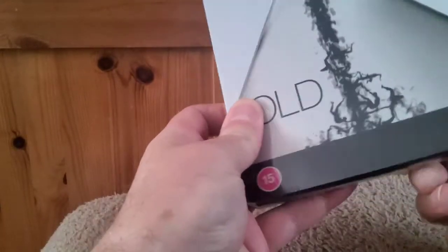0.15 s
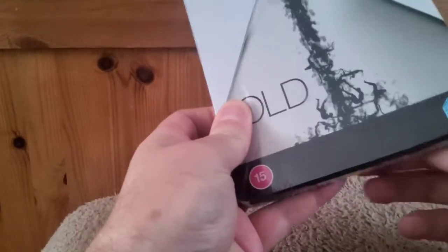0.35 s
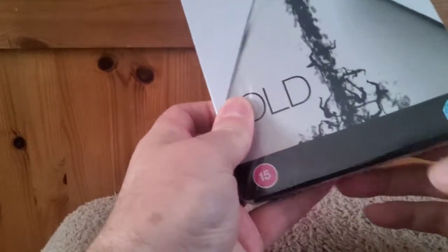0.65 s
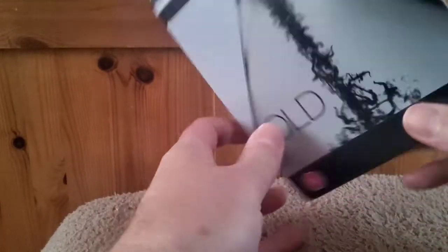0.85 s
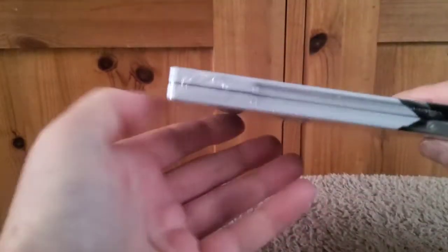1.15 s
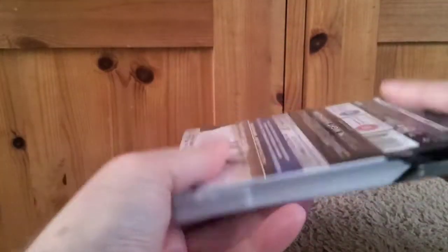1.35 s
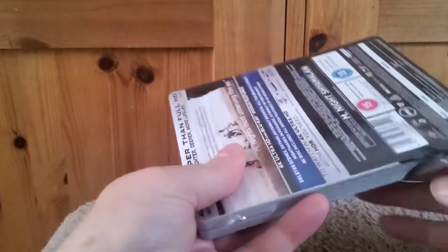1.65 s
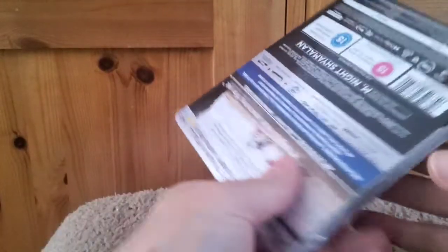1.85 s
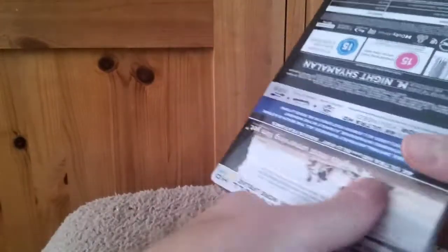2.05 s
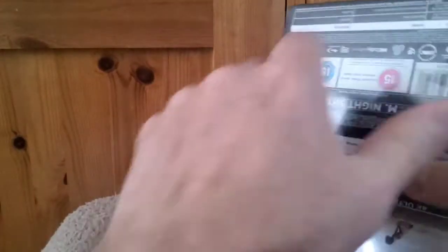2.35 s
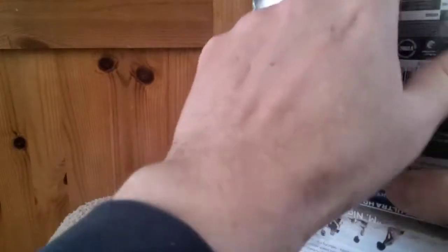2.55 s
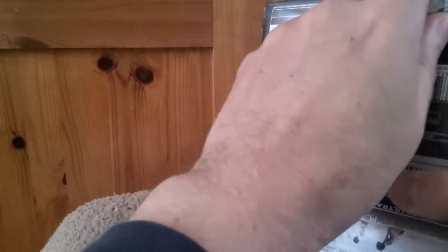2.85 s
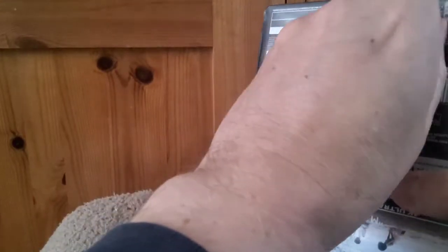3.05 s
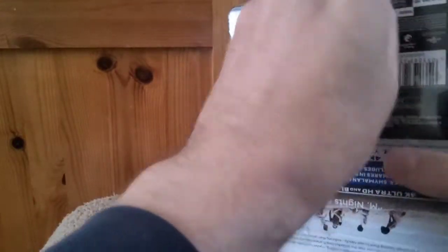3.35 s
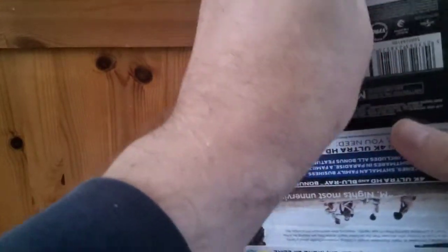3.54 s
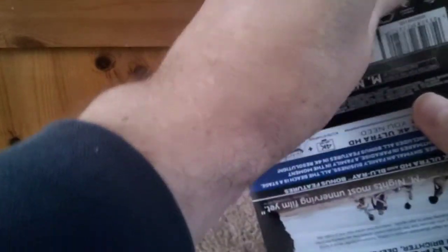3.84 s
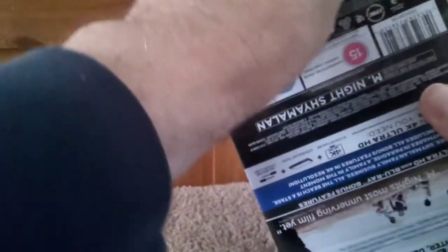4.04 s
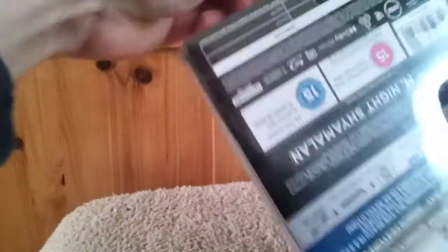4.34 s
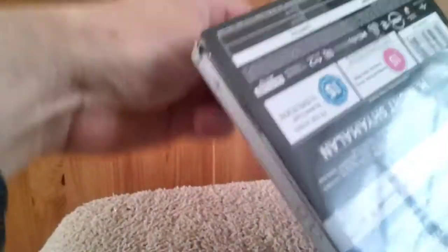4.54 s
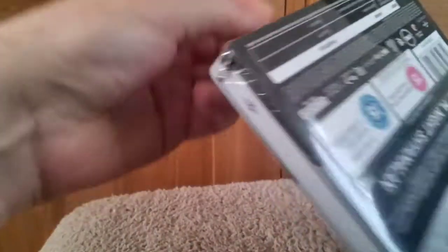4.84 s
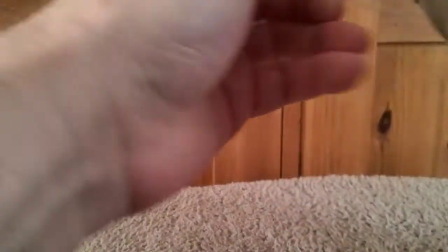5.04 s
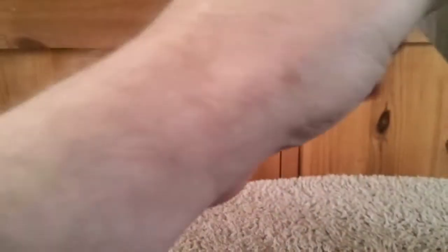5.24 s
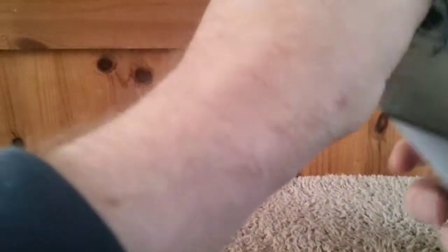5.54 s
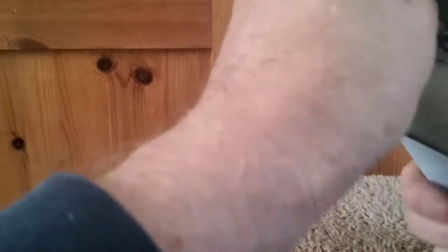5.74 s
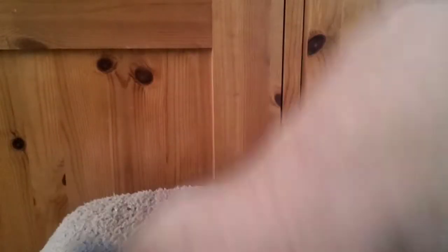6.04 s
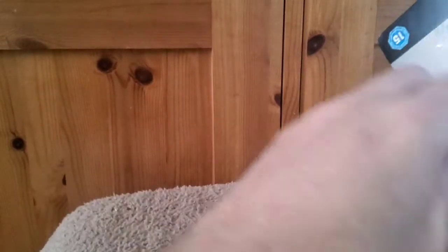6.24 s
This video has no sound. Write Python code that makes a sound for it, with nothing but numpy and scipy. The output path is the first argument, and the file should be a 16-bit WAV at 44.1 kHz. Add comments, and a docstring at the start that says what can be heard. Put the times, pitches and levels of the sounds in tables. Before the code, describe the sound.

Fingers pick at crinkly wrap on a light plastic case. The first three seconds are sparse: tiny clicks, skin brushing, one hollow knock as the case is turned. Then crisp film snaps gather into a thick crackling burst with woody-dull taps, ease off, and return in irregular clusters with a few hard cracks and a short swipe. Very close stereo pickup, mostly to the right, in a hushed, softly furnished room.

```python
"""Film wrap snaps and crackles as hands pick at it and turn over the plastic case it covers.
Each snap is a burst of jerks ringing a crease; crackle is clumped clicks, and sliding skin is shaped noise.
Knocks and rubbing excite short low modes of the hollow case, and the handling rumbles below.
It happens close to the right of a two-port microphone, in a quiet furnished room with a short tail and faint hiss.
"""
import sys
import numpy as np
from scipy import signal
from scipy.fft import rfft, irfft
from scipy.io import wavfile

SR = 44100
rng = np.random.default_rng(int(sys.argv[2]) if len(sys.argv) > 2 else 0)


def store_wav(level_fs):
    """Save 16-bit WAV to argv[1]."""
    pcm = np.round(np.clip(np.atleast_2d(level_fs), -1, 1) * 32767)
    wavfile.write(sys.argv[1], SR, pcm.T.astype(np.int16))


N = 281799

# Louder snaps of the film. Each row: start in seconds, peak of the bright crack in dB,
# crease pitch in Hz, peak of the dull fold in dB, left minus right in dB.
FILM_SNAPS = [(0.1244, -45, 2400, -49, -4), (0.179, -41, 10900, -72, 1), (0.253, -48.5, 3750, -76, -7),
              (0.364, -46.5, 9400, -86, -13), (0.524, -45.5, 2850, -74, 0), (0.6755, -37.5, 14400, -71, 0),
              (0.717, -40, 10700, -80, -2), (0.8173, -27.5, 3730, -66, -4), (0.8254, -36, 6350, -70, 0),
              (0.8476, -41, 3750, -53, -3), (0.967, -23.5, 6000, -31, -0.5),
              (1.127, -50, 7600, -49.5, -12.5), (1.227, -44, 7960, -78, -3), (1.362, -45, 10800, -67, -3),
              (1.4223, -40.5, 11500, -52.5, -10), (1.429, -45, 6300, -67, -5),
              (1.518, -48.5, 7040, -85, -1), (1.779, -49, 10900, -50, 2), (1.7917, -45, 11400, -52, -7),
              (1.866, -54, 13200, -67, -9), (2.1392, -48, 11100, -57, -7), (2.528, -41, 6250, -43, 1),
              (2.604, -45.5, 13700, -70, -11), (2.8765, -35, 5500, -59, -6), (2.8964, -39, 5830, -72, -5.5),
              (3.1058, -16, 6540, -45.5, -2), (3.1187, -33, 3370, -58, 3), (3.1313, -30.5, 6440, -52, 1),
              (3.1913, -39, 6300, -57, -21), (3.22, -22, 11300, -45, -7), (3.2795, -35, 9900, -48, -10),
              (3.289, -50, 3450, -54, -9), (3.3184, -27, 2630, -46, 1), (3.3457, -49, 3150, -49, 1),
              (3.352, -48, 3400, -66, 13), (3.4126, -33, 5600, -65, -6), (3.4514, -34, 5330, -67, -8),
              (3.466, -25, 11300, -52, -3), (3.4862, -31, 5440, -60, 0), (3.4928, -32, 11100, -62, -9),
              (3.534, -42, 4350, -66, -2), (3.6209, -33, 8450, -66, -6.5), (3.706, -39.5, 10200, -60, -13),
              (3.7953, -35, 11700, -72, -4), (3.814, -39, 12600, -74, -5), (3.884, -32.5, 4300, -56, -9),
              (3.8878, -36, 3080, -63, -3), (3.9299, -29.5, 11000, -56, -1), (3.9476, -29, 5970, -45, -11),
              (3.9633, -39, 4670, -30, -4), (3.979, -40, 3700, -27, 7), (3.9998, -54, 3800, -24.5, -13),
              (4.0092, -51, 3050, -25, 4), (4.021, -22.5, 3740, -22.5, -2), (4.028, -46, 9200, -32, 7),
              (4.049, -22.5, 2560, -24, -2), (4.067, -22, 3660, -38, -6), (4.0778, -23, 11500, -32, 2),
              (4.0843, -28, 6600, -33, -13), (4.0967, -39, 3620, -41, 6), (4.127, -39, 5100, -48, -11),
              (4.2236, -34.5, 4050, -40, -3), (4.2598, -44, 4000, -39.5, -3), (4.3302, -43, 3560, -58, 3),
              (4.491, -41.5, 6140, -50.5, -7), (4.5078, -44, 9050, -69, 14),
              (4.8045, -26.5, 4860, -38, -5.5), (4.822, -35, 4640, -63, 0), (4.931, -42, 13000, -58, 8),
              (4.9693, -41, 7500, -44, 4), (5.001, -29, 2650, -57, 2), (5.027, -41, 13600, -41, 4),
              (5.0424, -28.5, 4540, -38, -3), (5.0707, -30, 10900, -59, 1), (5.14, -35, 4330, -59, -1),
              (5.2166, -30, 5000, -40, -4), (5.258, -40, 9300, -64, -6), (5.334, -37, 3060, -70, 4),
              (5.344, -39, 6100, -45, -1), (5.389, -37, 4100, -48, -7), (5.4145, -46, 7300, -67, 4),
              (5.4364, -35, 8100, -64, -5), (5.4772, -52, 5850, -50, -6), (5.521, -34.5, 10900, -49, -10),
              (5.5303, -36.5, 3900, -69, 7), (5.558, -28, 7400, -56, -12), (5.585, -44, 11300, -52, 0),
              (5.6118, -33, 5870, -47, -13), (5.645, -49, 3400, -60, -2), (5.684, -35, 3030, -45, 0),
              (5.7275, -46, 5130, -45, 5), (5.7697, -12.5, 3280, -31, -5.5), (5.809, -21, 4870, -26, -9),
              (5.9053, -42.5, 4730, -72, -31), (5.914, -44, 9900, -68, -2), (5.965, -36, 9900, -73, -1),
              (5.9743, -12.5, 9800, -42, -10), (5.978, -21.5, 9150, -51, -18),
              (5.9917, -30, 9030, -62, -10), (6.149, -18, 11600, -37, -7.5),
              (6.1867, -25.5, 9900, -42.5, -12.5), (6.2066, -32.5, 10800, -57, -11),
              (6.2365, -39, 5400, -48, -4), (6.2697, -14, 11000, -36.5, -3), (6.3547, -30, 5030, -63, -5),
              (6.3686, -31.5, 2750, -44, -13.5)]
# Fingers and palm meeting the case. Each row: start in seconds, peak before the case's filters in dB,
# favoured pitch in Hz, ring time (60 dB fall) in seconds.
CASE_KNOCKS = [(0.1804, -46, 376, 0.15), (0.6182, -54.5, 358, 0.13), (0.6739, -49, 370, 0.14),
               (0.8182, -50, 430, 0.052), (0.8713, -48.5, 360, 0.047), (0.9666, -16, 280, 0.13),
               (1.128, -43, 590, 0.1), (1.1626, -40, 580, 0.013), (1.3427, -45.5, 324, 0.069),
               (1.416, -43.5, 370, 0.12), (1.7805, -49.5, 760, 0.067), (1.998, -55.5, 404, 0.068),
               (2.0927, -45, 580, 0.045), (2.5104, -36, 344, 0.032), (2.5151, -31, 198, 0.0054),
               (2.5225, -49, 338, 0.089), (2.5356, -38, 330, 0.04), (3.1179, -40.5, 510, 0.018),
               (3.189, -48, 440, 0.036), (3.2191, -59, 1450, 0.04), (3.411, -54.5, 450, 0.092),
               (3.465, -51, 200, 0.019), (3.5323, -47, 533, 0.047), (3.621, -38.5, 434, 0.038),
               (3.6451, -46, 380, 0.041), (3.8822, -43.5, 620, 0.069), (3.9468, -28.5, 470, 0.015),
               (3.9573, -26, 910, 0.019), (3.9807, -30, 433, 0.035), (3.9928, -23.5, 810, 0.066),
               (4, -26, 490, 0.11), (4.0071, -22, 1600, 0.08), (4.0476, -18, 550, 0.022),
               (4.0763, -27.5, 740, 0.11), (4.0987, -31.5, 505, 0.046), (4.1049, -32.5, 530, 0.025),
               (4.221, -39, 315, 0.016), (4.258, -45, 335, 0.019), (4.287, -41, 200, 0.0073),
               (4.3277, -32, 597, 0.09), (4.3469, -38, 312, 0.031), (4.5097, -46.5, 516, 0.16),
               (4.805, -39.5, 690, 0.07), (5.0047, -51, 514, 0.036), (5.029, -55, 1360, 0.035),
               (5.0401, -38.5, 282, 0.13), (5.2177, -35.5, 1400, 0.023), (5.3197, -46.5, 483, 0.05),
               (5.3426, -38.5, 590, 0.044), (5.3906, -41.5, 535, 0.048), (5.5037, -42, 520, 0.075),
               (5.575, -31.5, 257, 0.017), (5.681, -44.5, 507, 0.036), (5.6973, -42, 550, 0.027),
               (5.742, -29, 282, 0.024), (5.769, -19, 1580, 0.026), (5.8102, -28.5, 400, 0.052),
               (5.9761, -33, 415, 0.043), (5.981, -32, 292, 0.073), (6.0378, -32, 486, 0.072),
               (6.0769, -35.5, 550, 0.048), (6.15, -33, 530, 0.087), (6.1861, -30, 450, 0.011),
               (6.2067, -45, 580, 0.02), (6.2683, -32.5, 243, 0.0095), (6.3719, -28.5, 1630, 0.0043)]
# Modes of the hollow case. Each row: frequency in Hz, relative level in dB, factor on the ring time.
CASE_MODES = [(206, 0.5, 1.16), (302.7, 4, 0.3), (376, 5, 0.4), (492.4, 1.5, 0.56), (582.5, -1, 0.62),
              (711, -7, 0.5), (788, -4.5, 0.32), (1108, -10.5, 0.55), (1400, -1, .4), (1630, -6.5, 0.79)]
# Colour of the fine crackle. Each row: frequency in Hz, relative density in dB per Hz.
CRACKLE_COLOUR = [(1290, -34), (2200, -16), (2740, -9), (3770, -24), (4390, -12), (10700, -23.5),
                  (15300, -24), (16100, -14), (16500, -32)]
# Colour of the hiss. Each row: frequency in Hz, relative spectrum level in dB.
HISS_COLOUR = [(15, -29), (25, 6.5), (687, -8), (1010, -14.5), (1180, -10.5), (1930, -18.5), (6210, -12),
               (7510, -11), (10400, -8), (16500, -20.5)]
# Likeness of the hiss left and right. Each row: frequency in Hz, correlation from 0 to 1.
HISS_CORRELATION = [(60, 0.29), (290, 0.23), (640, 0.19), (1400, .02), (16000, .02)]
# Colour of skin sliding on film. Each row: frequency in Hz, relative spectrum level in dB.
SLIDE_COLOUR = [(1000, -30), (2200, -13), (4000, -12), (7000, -5), (9500, -5), (11000, 0), (12500, -5),
                (15400, -8), (16500, -30)]
# Quick swipes of a finger along the film. Each row: start in seconds, end in seconds, level in dB.
FINGER_SWIPES = [(0.67, 0.717, -64.5), (1.137, 1.145, -58), (1.318, 1.361, -64), (1.771, 1.805, -68),
                 (2.112, 2.138, -71), (3.327, 3.37, -63), (5.744, 5.798, -60), (6.023, 6.076, -40),
                 (6.17, 6.191, -47)]
# Tugs and squeezes of the film. Each row: start in seconds, hold in seconds, fine crackle in dB,
# broad folds in dB, sliding skin in dB, left minus right in dB.
FILM_TUGS = [(0.0, 0.025, -71, -54, -67, -7.5), (0.083, 0.06, -66.5, -64, -73.5, -7),
             (0.234, 0.16, -80, -100, -75, -7), (0.455, 0.073, -77.5, -100, -69, -4.5),
             (0.6, 0.06, -75.5, -100, -84, -6), (0.736, 0.11, -68, -88, -76, -5),
             (0.994, 0.021, -71, -65, -68, -5), (1.14, 0.037, -81, -65.5, -70.5, -5),
             (1.357, 0.055, -76, -73.5, -75, -9), (1.544, 0.34, -100, -87, -81.5, -4),
             (2.113, 0.075, -83, -66, -70, -2.5), (2.406, 0.044, -107, -75, -82, 11.5),
             (2.536, 0.086, -66, -67.5, -66.5, -3.5), (2.759, 0.026, -76, -100, -70, -6.5),
             (2.87, 0.026, -75.5, -100, -77, -8.5), (3.121, 0.051, -58, -79, -61, -6),
             (3.335, 0.017, -61, -86, -81, -9), (3.486, 0.057, -62, -87, -69.5, -1.5),
             (3.62, 0.018, -68.5, -61.5, -87, -1.5), (3.724, 0.098, -66.5, -79, -69, -5.5),
             (3.973, 0.11, -47, -47, -54, -7.5), (4.147, 0.19, -68, -59, -81, -1.5),
             (4.319, 0.013, -56.5, -56.5, -69, -5.5), (4.472, 0.038, -67.5, -64, -63.5, -2.5),
             (4.613, 0.064, -75, -71, -76, -8.5), (4.81, 0.014, -58, -61, -61, -0.5),
             (4.959, 0.12, -56.5, -68, -60.5, -10.5), (5.17, 0.3, -74.5, -89, -84, -11.5),
             (5.346, 0.2, -60.5, -74, -73, -5), (5.548, 0.1, -56.5, -61, -64, -7.5),
             (5.777, 0.01, -45.5, -80, -75, -12.5), (5.84, 0.02, -85, -92, -76, -5),
             (6.036, 0.017, -42.5, -78, -49, -9), (6.18, 0.018, -64, -64, -63, -6),
             (6.256, .11, -71, -68, -62.5, -2)]
# Shifts of the grip on the case. Each row: start in seconds, hold in seconds,
# rubbing drive in dB, favoured pitch in Hz, rumble drive in dB.
GRIP_SHIFTS = [(0.0, 0.12, -55, 363, -58), (0.254, 0.089, -69, 375, -79), (0.764, 0.021, -63, 353, -65),
               (0.846, 0.008, -66.5, 387, -72), (0.974, 0.012, -64, 248, -45.5),
               (1.045, 0.023, -67, 297, -65), (1.136, 0.036, -54.5, 226, -80),
               (1.34, 0.011, -56.5, 380, -67), (1.438, 0.032, -78, 404, -58.5),
               (1.616, 0.079, -85, 364, -80), (1.8, 0.056, -71.5, 456, -77),
               (2.081, 0.072, -62.5, 414, -57.5), (2.401, 0.036, -65, 535, -76),
               (2.515, 0.0093, -49.5, 390, -52), (2.604, 0.011, -62, 303, -64),
               (2.78, 0.013, -110, 328, -79), (3.124, .04, -91, 448, -60), (3.234, 0.097, -84, 500, -80),
               (3.474, 0.026, -65, 323, -54), (3.633, 0.014, -62.5, 409, -60),
               (3.73, 0.14, -74, 424, -72.5), (3.915, 0.17, -57.5, 530, -51),
               (4.146, 0.044, -54.5, 474, -49.5), (4.268, 0.021, -64, 390, -48.5),
               (4.302, 0.054, -56.5, 503, -50.5), (4.493, 0.013, -56.5, 476, -82),
               (4.616, 0.33, -72.5, 590, -80), (5.001, 0.036, -53.5, 282, -54),
               (5.227, 0.008, -62, 372, -73), (5.36, .01, -65, 517, -60), (5.454, .19, -57.5, 410, -65),
               (5.756, 0.043, -50.5, 450, -57), (5.9, 0.0083, -64, 315, -85), (5.993, 0.023, -77, 376, -48),
               (6.046, 0.013, -49, 468, -46), (6.147, 0.056, -70, 420, -54), (6.296, .04, -61.5, 418, -57)]

HISS_DB = -76
LEFT_LAG_S = 0.0002   # the case is nearer the right port
CUTOFF_HZ = 16800
ROOM_T60_S, ROOM_DB = 0.24, -16
WALL_CUT_HZ, ALIKE_BELOW_HZ = 6160, 740
KNOCK_PAN_DB, KNOCK_PAN_DB_PER_OCTAVE = 1.5, -3.5   # left minus right at 400 Hz; change with pitch
TUG_RISE_DB_PER_S, TUG_FALL_DB_PER_S = 250.5, 203
SHIFT_RISE_DB_PER_S, SHIFT_FALL_DB_PER_S = 599, 259
SKIN_AT_REST_DB, HANDS_AT_REST_DB = -100, -87.5
SMALL_SNAPS_PER_S = 45
# largest peak over the fine crackle; range below that; fold relative to the peak
SMALL_OVER_CRACKLE_DB, SMALL_SPREAD_DB, SMALL_FOLD_DB = 21, 14, -16.5


def from_db(db):
    """Turn a level in dB into a gain."""
    return 10 ** (np.asarray(db) / 20)


def rms_one(x):
    """Scale to rms 1."""
    return x / np.sqrt(np.mean(x ** 2) + 1e-20)


def at_hz(points, hz):
    """Read a curve on a log-frequency axis."""
    point_hz, value = np.transpose(points)
    return np.interp(np.log(np.maximum(hz, 1)), np.log(point_hz), value)


def band(x, low_hz, high_hz):
    """Band-pass with gentle skirts."""
    edges = [low_hz, min(high_hz, .45 * SR)]
    return signal.sosfilt(signal.butter(2, edges, "band", fs=SR, output="sos"), x)


def drift(rate_hz):
    """Low-passed noise of rms 1, wandering at about the given rate."""
    r = np.exp(-2 * np.pi * rate_hz / SR)
    noise = rng.standard_normal(N + SR)
    return rms_one(signal.lfilter([1], [1, -2 * r, r * r], noise)[SR:])   # drop the run-in


def ring(clicks, hz, t60):
    """Resonator: a unit click starts a dying sine of initial height 1."""
    r = from_db(-60 / (t60 * SR))
    w = 2 * np.pi * min(hz, .45 * SR) / SR
    return signal.lfilter([0, np.sin(w)], [1, -2 * r * np.cos(w), r * r], clicks + 1e-18)


def at_ports(near, far, pan_db):
    """Near feeds the right, far reaches the left later; the pan is split between them."""
    lag = np.exp(-2j * np.pi * np.fft.rfftfreq(N, 1 / SR) * LEFT_LAG_S)
    late = irfft(rfft(far) * lag, N)
    return np.array([late * from_db(pan_db / 2), near * from_db(-pan_db / 2)])


def mid_and_side(mid, side, alike):
    """Blend two independent signals into a left-right pair of the given correlation."""
    return np.sqrt(1 + alike) * mid + np.sqrt(1 - alike) * side * [[1], [-1]]


def grains(per_s, spread_db, clump_db):
    """Random clicks of uneven size and either sign; a drifting rate gathers them in clumps."""
    born = rng.random(N) < per_s * from_db(clump_db * drift(40.0)) / SR
    size = from_db(spread_db * np.minimum(rng.exponential(1, N), 4))
    return born * size * rng.choice([-1, 1], N)


def swelling(start, hold, level_db, rise_db_per_s, fall_db_per_s, rest_db):
    """Summed gain of gestures: each swells, holds and dies away, over a resting level."""
    t = np.arange(0, N, 32) / SR   # a coarse clock is enough
    gain = from_db(rest_db)
    for s, length, db in zip(start, hold, level_db):
        rise = rise_db_per_s * np.maximum(s - t, 0)
        fall = fall_db_per_s * np.maximum(t - s - length, 0)
        gain = gain + from_db(db - rise - fall)
    return np.interp(np.arange(N) / SR, t, gain)


def gliding(rows, column):
    """A column that glides from the middle of one gesture to the middle of the next."""
    rows = np.transpose(rows)
    return np.interp(np.arange(N) / SR, rows[0] + rows[1] / 2, rows[column])


def shifting(column):
    """Gain of one layer as the grip shifts."""
    rows = np.transpose(GRIP_SHIFTS)
    return swelling(rows[0], rows[1], rows[column], SHIFT_RISE_DB_PER_S, SHIFT_FALL_DB_PER_S, HANDS_AT_REST_DB)


def tugging(column, rest_db=-110.):
    """Gain of one layer as the film is tugged."""
    rows = np.transpose(FILM_TUGS)
    return swelling(rows[0], rows[1], rows[column], TUG_RISE_DB_PER_S, TUG_FALL_DB_PER_S, rest_db)


def swiping(edge_s=0.0089):
    """Gain of the finger swipes: each starts and stops within a few milliseconds."""
    t = np.arange(N) / SR
    gain = np.zeros(N)
    for start, end, db in FINGER_SWIPES:
        inside_s = np.minimum(t - start, end - t)
        gain += from_db(db) * np.clip(inside_s / edge_s + .5, 0, 1)
    return gain


def hiss():
    """Steady room and microphone noise, partly alike in both channels low down, hardly so above."""
    hz = np.fft.rfftfreq(N, 1 / SR)
    colour = from_db(at_hz(HISS_COLOUR, hz)) * (hz > 20)
    mid, side = rfft(rng.standard_normal((2, N))) * colour
    alike = np.clip(at_hz(HISS_CORRELATION, hz), -1, 1)
    return from_db(HISS_DB) * rms_one(irfft(mid_and_side(mid, side, alike), N))


def room(x):
    """A tail of dying noise, dulled by soft furnishings; long waves reach both ports alike."""
    t = np.arange(SR // 2) / SR
    dying = from_db(-60 * t / ROOM_T60_S) * (t > .003)
    mid, side = rng.standard_normal((2, len(t))) * dying
    tail = band(mid, 300, WALL_CUT_HZ) + band(side, ALIKE_BELOW_HZ, WALL_CUT_HZ) * [[1], [-1]]
    tail *= from_db(ROOM_DB) / np.sqrt(np.sum(tail ** 2, axis=1, keepdims=True))
    return signal.fftconvolve(x.mean(axis=0, keepdims=True), tail, axes=1)[:, :N]


def rumble(alike=0.54, centre_hz=78, wander_octaves=0.61, lump_db=4.5):
    """Moving hands and sleeves give low bumps of unsteady pitch, more at the left port."""
    def bumps():
        """A sine whose level and pitch both wander."""
        level = from_db(lump_db * drift(43.0))
        pitch_hz = centre_hz * 2 ** (wander_octaves * drift(35.2))
        return level * np.sin(2 * np.pi * np.cumsum(pitch_hz) / SR)

    pair = rms_one(mid_and_side(bumps(), bumps(), alike))
    return band(shifting(4) * pair * from_db([[3.0], [-3.0]]), 53, 170)


def rubbing(t60=0.043, fall_db=10.5):
    """Slips of skin on the case feed its low modes, most those near the spot that is rubbed."""
    spot_hz = gliding(GRIP_SHIFTS, 3)
    slips = grains(600.0, spread_db=2.5, clump_db=3.5)
    rubbed, power = 0, 0
    for hz, level_db, lasting in CASE_MODES[:8]:
        gain = from_db(level_db - fall_db * np.abs(np.log2(hz / spot_hz)))
        uneven_slips = slips * rng.normal(1, 1.0, N)
        rubbed = rubbed + gain * rms_one(ring(uneven_slips, hz, t60 * lasting))
        power = power + gain ** 2
    # even out the level as the spot moves, then let the pressing hand set it
    rubbed = shifting(2) * band(rubbed / np.sqrt(power), 190, 1200)
    return at_ports(rubbed, rubbed, 1.6)


def knocks(fall_db=23.0, contact_s=0.00043):
    """A blow favours the modes near where it lands; the grip sets how long they ring."""
    length = 8000
    t, out = np.arange(length) / SR, np.zeros((2, N + length))
    hz, level_db, lasting = np.transpose(CASE_MODES)[:, :, None]
    strengths_db = rng.normal(0, 2, (len(CASE_KNOCKS), len(CASE_MODES), 1))   # no two blows alike
    for (s, peak_db, best_hz, t60), own_db in zip(CASE_KNOCKS, strengths_db):
        pan_db = KNOCK_PAN_DB + KNOCK_PAN_DB_PER_OCTAVE * np.log2(best_hz / 400)
        away_db = fall_db * np.abs(np.log2(hz / best_hz))
        gains = from_db(level_db + own_db - away_db - 60 * t / (t60 * lasting))
        blow = -np.sum(gains * np.sin(2 * np.pi * hz * t), axis=0)
        blow *= 1 - np.exp(-t / contact_s)   # soft contact
        # a small patch of wall sends out little below its own pitch
        blow = band(blow, 0.24 * best_hz, 15.0 * best_hz)
        at = round(s * SR)
        port_db = [[peak_db - pan_db / 2], [peak_db + pan_db / 2]]   # right, left
        out[:, at:at + length] += blow / np.abs(blow).max() * from_db(port_db)
    # a small case radiates little below its first mode
    near, far = band(band(out[:, :N], 170, 4000), 230, 9000)
    return at_ports(near, far, 0)


def fine_creases():
    """Clumped clicks ring small creases for a few cycles each, at 24 pitches across the treble."""
    clicks = grains(2500, spread_db=4.5, clump_db=6)
    dealt = rng.integers(0, 24, N)   # which crease each click strikes
    near, far = 0, 0
    for k, hz in enumerate(np.geomspace(2400, 12000, 24)):
        crease = from_db(at_hz(CRACKLE_COLOUR, hz)) * hz * ring(clicks * (dealt == k), hz, 9 / hz)
        near = near + crease
        far = far + crease * from_db(rng.normal(0, 5))   # each crease faces the ports differently
    return rms_one(near), rms_one(far)


def broad_folds():
    """Broad folds of the film flex as clumped clicks in a lower band."""
    clicks = grains(1500.0, spread_db=-1.5, clump_db=8.5)
    return tugging(3) * rms_one(band(band(clicks, 1300, 3500), 910, 2900))


def sliding_skin():
    """Skin sliding on film: two shaped noises that flutter with the tugs and sound in the swipes."""
    colour = from_db(at_hz(SLIDE_COLOUR, np.fft.rfftfreq(N, 1 / SR)))
    skin = irfft(rfft(rng.standard_normal((2, N))) * colour, N)
    sliding = tugging(4, SKIN_AT_REST_DB) * from_db(3.78 * drift(56.0))
    return (sliding + swiping()) * rms_one(skin)


def crackle():
    """Small creases crackle in the treble, broad folds lower down; sliding skin hisses on top."""
    fine = tugging(2)
    near, far = fine_creases()
    folds, slide = broad_folds(), sliding_skin()
    right = fine * near + folds + slide[0]
    left = fine * far + folds + 0.033 * slide[0] + 1.47 * slide[1]
    return at_ports(right, left, gliding(FILM_TUGS, 5))


def small_snaps():
    """Rows of lesser snaps at random moments and pitches, their strength following the fine crackle."""
    when, pitch, size, side = rng.random((int(SMALL_SNAPS_PER_S * N / SR), 4)).T
    at = (when * (N - 1)).astype(int)
    crackle_db = 20 * np.log10(tugging(2)[at])
    peak_db = crackle_db + SMALL_OVER_CRACKLE_DB - SMALL_SPREAD_DB * size
    crease_hz = 2500 * 4.5 ** pitch
    pan_db = gliding(FILM_TUGS, 5)[at] + 16 * (side - .5)
    return list(zip(at / SR, peak_db, crease_hz, peak_db + SMALL_FOLD_DB, pan_db))


def snaps(crack_db=1.0):
    """A crease flips in brief jerks: a broad crack, the crease's own pitch and a duller fold."""
    length, cycles = 700, 7
    rise_s, burst_s, fold_s = .0001, .0005, .0011
    after_s, after_db = .0025, -15
    t, near, far = np.arange(length) / SR, np.zeros(N + length), np.zeros(N + length)
    rows = list(FILM_SNAPS) + small_snaps()
    jerks = rng.standard_normal((len(rows), 3, length)) * (1 - np.exp(-t / rise_s))
    # a sharp flip, then the sheet settles
    shaking = np.exp(-t / burst_s) + from_db(after_db) * np.exp(-t / after_s)
    for (s, peak_db, hz, fold_db, pan_db), jerk in zip(rows, jerks):
        # the far port sees the crease from another side, so it gets its own jerks
        both = jerk[:2] * shaking
        bright = rms_one(ring(both, hz, cycles / hz))
        bright += from_db(crack_db) * rms_one(band(both, 2700, 11550))
        bright *= from_db(peak_db) / np.abs(bright).max(axis=1, keepdims=True)
        dull = band(band(jerk[2] * np.exp(-t / fold_s), 1235, 2010), 810, 3000)
        dull *= from_db(fold_db) / np.abs(dull).max()
        at = round(s * SR)
        near[at:at + length] += (bright[0] + dull) * from_db(-pan_db / 2)
        far[at:at + length] += (bright[1] + dull) * from_db(pan_db / 2)
    return at_ports(near[:N], far[:N], 0)


def scene(knock_in_room_db=5.0):
    """Film and case sound into the room; low knocks spread all round and get an extra send."""
    rustle = snaps() + crackle() + rubbing()
    blows = knocks()
    tail = room(rustle + from_db(knock_in_room_db) * blows)
    return rustle + blows + tail + rumble() + hiss()


def record(dry):
    """Cut the extreme treble steeply, 70 dB down from the cutoff upward."""
    return signal.sosfilt(signal.cheby2(12, 70, CUTOFF_HZ, fs=SR, output="sos"), dry)


dry = scene()
out = record(dry)
store_wav(out)
```